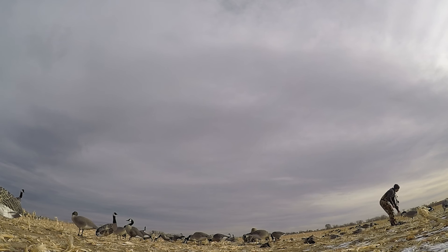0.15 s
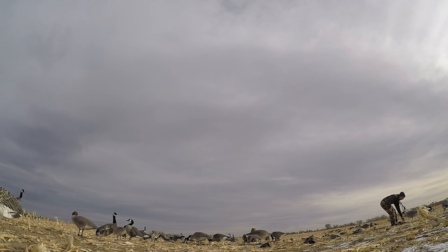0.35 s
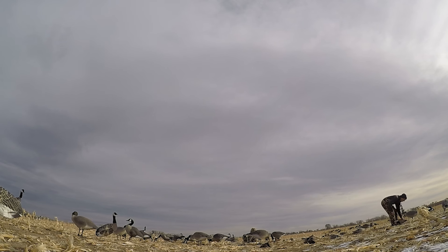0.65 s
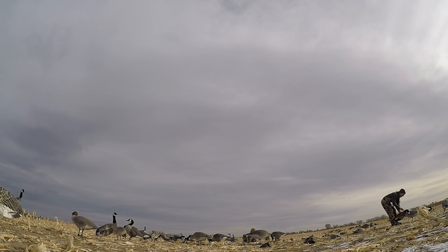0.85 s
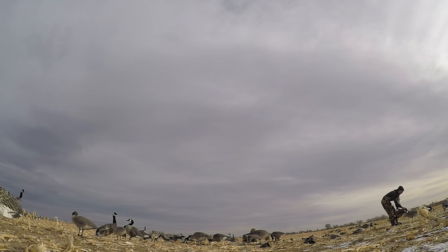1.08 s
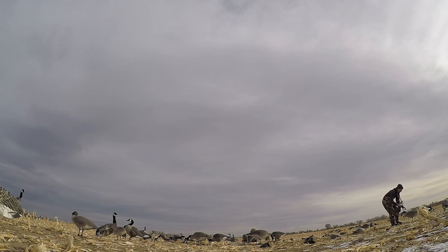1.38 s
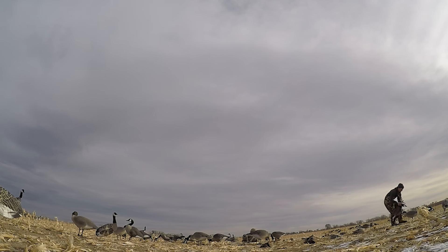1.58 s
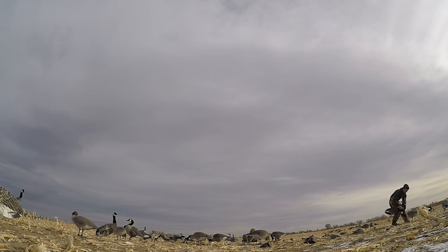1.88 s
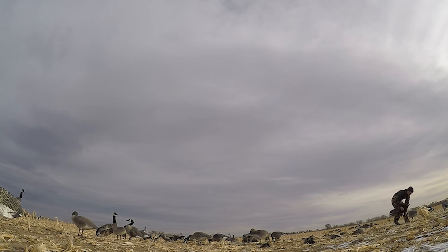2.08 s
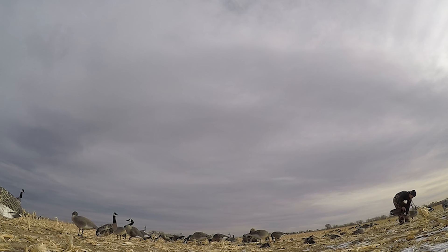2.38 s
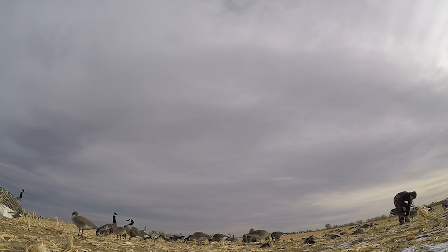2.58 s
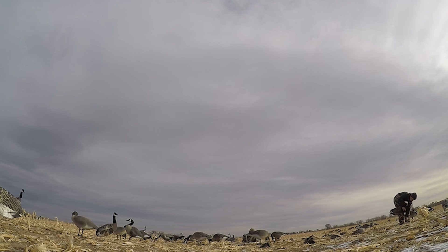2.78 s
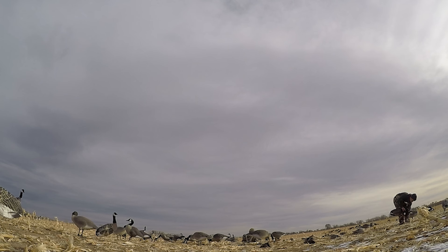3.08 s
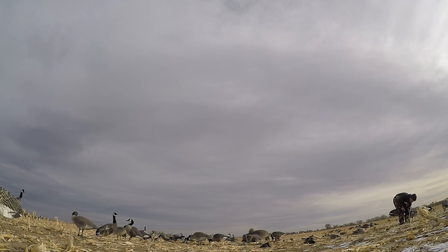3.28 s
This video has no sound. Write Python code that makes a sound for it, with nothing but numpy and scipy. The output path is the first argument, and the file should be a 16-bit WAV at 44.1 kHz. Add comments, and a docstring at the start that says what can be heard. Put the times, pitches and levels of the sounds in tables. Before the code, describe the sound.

Strong wind batters a small exposed microphone in an open stubble field: a loud, deep, fluttering rumble, fullest around 0.75 s, easing near 1.9 s, swelling again about 2.6 s, then weakening to the end at roughly 3.4 s. Hollow rushing air and fine hiss with a very faint whine sit above. Quiet straw snaps and rustles occur around 0.5, 1.05, 1.6 and, sharpest, 2.25-2.5 s.

```python
"""A deep, buffeting rumble fills the sound as strong wind shakes a small camera in a stubble field.
Air rushes and hisses around the housing, with a thin whine in the hiss: all this is noise shaped by pitch.
Some way off, someone treads on dry straw: short bursts of noise with a ping make the snaps,
and dense random clicks make the rustles. A limiter holds the highest peaks."""
import sys
import numpy as np
from scipy import signal
from scipy.fft import rfft, irfft
from scipy.io import wavfile
from scipy.ndimage import uniform_filter1d, minimum_filter1d

SR = 44100
rng = np.random.default_rng(int(sys.argv[2]) if len(sys.argv) > 2 else 0)


def master(y):
    """Save y as 16-bit WAV."""
    cut = np.clip(np.atleast_2d(y).T, -1, 1)
    pcm = np.round(cut * 32767)  # scale
    wavfile.write(sys.argv[1], SR, pcm.astype(np.int16))


N = 152145  # length [samples]

# Strength of the wind: (time [s], level [dB])
WIND_LEVEL = [(0, 1), (.75, 1.45), (1.3, 0.5), (1.9, -0.5), (2.6, 0.9), (3.45, -1.4)]

# In the functions below, a "spectrum" gives the balance of pitches at the two microphone ports,
# and "ports" tells how alike the two hear a sound and how far the left one leads.


def amp(db):
    """Turns decibels into a gain."""
    return 10 ** (np.asarray(db) / 20)


def unit(x):
    """Scales a signal to an average strength (rms) of 1."""
    return x / np.sqrt(np.mean(x ** 2) + 1e-20)


def by_hz(table, hz):
    """Reads every column of a table at the given frequencies, on a logarithmic axis."""
    table_hz, *columns = np.transpose(table)
    place, table_place = np.log(hz + 1), np.log(table_hz + 1)
    return np.array([np.interp(place, table_place, column) for column in columns])


def by_time(table):
    """Reads a curve of (time, level) at every sample."""
    return np.interp(np.arange(N) / SR, *np.transpose(table))


def add(mix, start, sound):
    """Mixes in a stereo sound that starts at the given second."""
    first = max(round(start * SR), 0)
    part = mix[:, first:][:, :sound.shape[1]]
    part += sound[:, :part.shape[1]]


def wander(rate_hz):
    """Slow random drift of rms 1: noise that keeps little above the given rate."""
    hz = np.fft.rfftfreq(N, 1 / SR)
    slow = (hz > 0) * np.exp(-(hz / rate_hz) ** 2)
    return unit(irfft(rfft(rng.standard_normal(N)) * slow, N))


def at_ports(x, spectrum, ports):
    """Turns two unrelated signals into what the ports hear: partly shared, shifted in phase, coloured."""
    hz = np.fft.rfftfreq(N, 1 / SR)
    shared, own = rfft(x)
    same, lead = by_hz(ports, hz)
    same = np.clip(same, 0, 1)
    right = (same * shared + np.sqrt(1 - same ** 2) * own) * np.exp(-1j * lead)
    pair = np.array([shared, right])
    skirt = 1 / (1 + (hz / spectrum[-1][0]) ** 8)  # fades out above the last row of the table
    colour = unit(amp(by_hz(spectrum, hz)) * skirt)
    return irfft(pair * colour, N)


def port_noise(spectrum, ports):
    """Turbulence as coloured noise of rms 1 at the two ports."""
    return unit(at_ports(rng.standard_normal((2, N)), spectrum, ports))


def rumble():
    """Eddies press on both ports almost alike, as deep noise that swells with the wind."""
    # (frequency [Hz], left relative level per Hz [dB], right relative level per Hz [dB])
    rumble_spectrum = [(8.1, -22, -12), (15.4, -3.5, -3), (26.2, -1.5, 0), (43.3, -1, -1.5), (74, -2, -4),
                       (100, -7, -8.5), (138.6, -12, -13.5), (201.6, -19.5, -22.5), (255, -26.5, -29),
                       (339, -32.5, -37.5), (462, -44.5, -56), (1460, -57.5, -75)]
    # (frequency [Hz], likeness [0-1], lead of the left port [rad])
    rumble_ports = [(30, 0.98, -0.0038), (101, 1, 0.23), (210, 0.94, 0.1), (350, 0.5, -0.49)]
    base_db, eddy_db = -7.5, 0.9
    level_db = base_db + by_time(WIND_LEVEL) + eddy_db * wander(rate_hz=6.1)
    return amp(level_db) * port_noise(rumble_spectrum, rumble_ports)


def rush():
    """Air rushes around the housing with a hollow sound that follows most of the wind's changes in dB."""
    # (frequency [Hz], left relative level per Hz [dB], right relative level per Hz [dB])
    rush_spectrum = [(200, -1, -16), (338, -10, -8), (432, -3, -1.5), (552, 0.5, 1), (710, -3, -1),
                     (870, -4.5, -0.5), (1156, -13, -10.5), (1160, -13.5, -5), (1410, -15, -13.5),
                     (1880, -21.5, -19.5), (3540, -31, -36)]
    # (frequency [Hz], likeness [0-1], lead of the left port [rad])
    rush_ports = [(300, 0.77, -5.5), (453, 0.99, -4), (572, 0.94, -5), (790, 0.68, -6), (975, 0.4, -8),
                  (1245, 0.12, -7.5), (1710, 0.46, -9.5)]
    base_db, flutter_db, follow = -33, 0.5, 0.8
    level_db = base_db + follow * by_time(WIND_LEVEL) + flutter_db * wander(rate_hz=3.5)
    return amp(level_db) * port_noise(rush_spectrum, rush_ports)


def hiss():
    """Fine air noise, plus a thin, unsteady whine made of noise in a very narrow band."""
    # (frequency [Hz], left relative level per Hz [dB], right relative level per Hz [dB])
    hiss_spectrum = [(1000, -10.5, -11), (2670, -8.5, -5.5), (3870, -11.5, -10.5), (4400, -9, -10.5),
                     (4760, -13, -10), (5660, -7.5, -10), (6870, -6, -4), (7750, -12, -3.5),
                     (8100, -11.5, -7.5), (9950, -11.5, -8.5), (11800, -15, -15.5), (14000, -18, -17)]
    # (frequency [Hz], likeness [0-1], lead of the left port [rad])
    hiss_ports = [(1730, 0.21, -10), (3000, 0.33, -13), (4970, 0.27, -11.5), (5970, 0.48, -14.5),
                  (8000, 0.29, -15), (10000, .05, -14)]
    # Rise and fall of air and whine together: (time [s], level [dB])
    hiss_level = [(0, -0.2), (.24, 1.6), (.32, -1), (.48, 0.2), (.7, 1.5), (.98, 1), (1.2, 2), (1.65, 1.5),
                  (1.95, .6), (2.3, 0.8), (2.75, 1.5), (2.93, 1), (3.0, -2), (3.15, -1), (3.3, 1),
                  (3.45, -0.3)]
    # Whine before that rise and fall: (left [dB], right [dB])
    whine_db = (-70, -56)
    base_db, flicker_db = -47, 0.53
    whine_hz, whine_width_hz = 7790, 65

    air = amp(base_db + flicker_db * wander(rate_hz=19)) * port_noise(hiss_spectrum, hiss_ports)
    hz = np.fft.rfftfreq(N, 1 / SR)
    narrow = 1 / (1 + (2 * (hz - whine_hz) / whine_width_hz) ** 2)
    whine = unit(irfft(rfft(rng.standard_normal((2, N))) * narrow, N))
    return amp(by_time(hiss_level)) * (air + amp(whine_db)[:, None] * whine)


def snap(level_db, body_db, middle_db, edge_db, ring_hz, ring_db):
    """One stalk breaks: brief splintering, a short ping of its tube and a faint scatter from the ground."""
    # Centres of the three bands: (body [Hz], middle [Hz], edge [Hz])
    bands_hz = (2850, 5000, 9100)
    # A plain stalk, which gets no colour: (body [dB], middle [dB], edge [dB])
    plain_db = (-10, -8.5, -3.5)
    trim_db, colour_share = -6.5, 0.93
    rise_s, hold_s, decay_s, ring_decay_s = 0.0006, 0.0014, 0.0016, 0.0016
    scatter_db, scatter_s = -15.5, 0.019
    size = 4096  # samples
    t, hz = np.arange(size) / SR, np.fft.rfftfreq(size, 1 / SR)

    bands_db = np.subtract([body_db, middle_db, edge_db], plain_db)
    colour = amp(colour_share * by_hz(np.transpose([bands_hz, bands_db]), hz))
    fibres = irfft(rfft(rng.standard_normal((2, size))) * colour, size)
    splinter = np.exp(-np.maximum(t - hold_s, 0) / decay_s)
    scatter = amp(scatter_db) * np.exp(-t / scatter_s)
    phase = rng.random((2, 1))  # in turns, one for each channel
    tube = amp(ring_db) * np.exp(-t / ring_decay_s) * np.sin(2 * np.pi * (ring_hz * t + phase))
    onset = np.minimum(t / rise_s, 1)
    return amp(trim_db + level_db) * onset * ((splinter + scatter) * fibres + tube)


def grains(per_s, spread_db):
    """Random clicks of uneven size, each with its own strength in the two channels; rms 1 overall."""
    size = amp(spread_db * np.minimum(rng.exponential(1, N), 4))
    clicks = size * (rng.random(N) < per_s / SR)
    return unit(clicks * rng.standard_normal((2, N)))


def straw():
    """Dry stalks snap, crunch in rustles under the boots, and tick here and there in the wind."""
    # Stalks that snap, before trim and colouring: (time [s], level [dB], body [dB], middle [dB],
    # edge [dB], ring [Hz], ring level [dB])
    snaps = [(0.2213, -31, -13, -23, -4, 4000, -8), (0.5144, -17, -9.5, -14, -9.5, 7130, -1.5),
             (0.5177, -28.5, -6, -8, -10, 8400, -3), (0.553, -27.5, -20, -12, -5, 7000, -3),
             (0.6564, -31, -14, -14, -5, 4590, -6), (0.6927, -31.5, -12, -9, -9, 4100, -6),
             (0.745, -26, -17, -13, -5, 7360, -9), (0.7808, -28, -21, -16, -7, 7100, -5),
             (1.0411, -27, -14, -12, -8, 6100, 3), (1.044, -26, -8, -12, -11, 5940, -3),
             (1.053, -25, -10, -17, -13, 5560, -5), (1.0827, -25, -9, -21, -6.5, 7040, -5),
             (1.2427, -29, -1, -14, -21, 4430, 3), (1.3238, -22, -16, -15, -4, 7450, -11),
             (1.5742, -25, -12, -14, -18, 5200, 0), (1.6194, -27, -10, -12, -15, 7440, -8),
             (1.6734, -30, -15, -9, -9, 5510, -5), (1.7535, -24.5, -11, -8, -7, 4860, 4),
             (1.8501, -30, -7, -15, -18, 5520, -5), (2.017, -28, -19, -14, -5.5, 3900, -8),
             (2.1559, -28, -11, -10, -13, 7400, -10), (2.1714, -32, -16, -19, -4, 7100, -6),
             (2.2213, -29, -18, -8, -7, 7500, -10), (2.2365, -26, -18, -9, -6, 5300, -1),
             (2.2635, -13, -16, -14.5, -5.5, 2800, -13), (2.3135, -26, -18, -15, -5, 5280, 2.5),
             (2.3752, -25.5, -20, -16, -5, 8460, 1.5), (2.4504, -17.5, -26, -18, -5.5, 5300, 0),
             (2.466, -20.5, -21, -15, -6, 5350, 3), (2.486, -25.5, -13, -18, -12, 4360, 0),
             (2.681, -24.5, -23, -17, -8, 6700, 0), (2.8355, -32.5, -14, -13, -17, 4270, -1)]
    # Boots brushing through the straw, before colouring: (start [s], length [s], level [dB])
    rustles = [(.74, 0.1, -46), (1.032, 0.036, -39.5), (1.061, 0.049, -40), (1.107, 0.11, -47.5),
               (1.549, 0.05, -41), (1.596, 0.058, -39.5), (1.844, .03, -55), (2.228, 0.015, -43.5)]
    # (frequency [Hz], left relative level per Hz [dB], right relative level per Hz [dB])
    straw_spectrum = [(700, -30, -30), (2370, -10, -7), (3000, -12, -7.5), (4030, -23, -14),
                      (4320, -13, -4), (5100, -14, -12.5), (5620, -6, -8), (6340, -13, -8.5), (7230, -6, 1),
                      (8180, -12, -3), (9500, -22, -15.5), (11300, -29, -27.5), (14000, -38, -35)]
    # (frequency [Hz], likeness [0-1], lead of the left port [rad])
    straw_ports = [(2050, 0.17, -9.5), (3020, 0.57, -14), (4070, 0.71, -11), (4900, 0.73, -14.5),
                   (5540, 0.95, -14.5), (6200, 1, -15), (8200, 0.75, -14.5), (10000, .3, -14.5)]
    ticks_db = -57.5
    peak_share = 0.26  # where in its length a rustle is loudest

    t = np.arange(N) / SR
    out = amp(ticks_db) * grains(per_s=90, spread_db=1)
    crunch = grains(per_s=1600, spread_db=1.5)
    for start, length, db in rustles:
        pressure = np.interp((t - start) / length, [0, peak_share, 1], [0, 1, 0])
        out = out + amp(db) * np.sqrt(pressure) * crunch
    for start, *stalk in snaps:
        add(out, start, snap(*stalk))
    return at_ports(out, straw_spectrum, straw_ports)


def scene():
    """Adds up the wind at the camera and the straw in the field."""
    return rumble() + rush() + hiss() + straw()


def record(dry):
    """A fast look-ahead limiter rounds the highest swings; then a filter removes the top treble."""
    ceiling, knee = 0.98, 4.7  # a higher knee bends more sharply
    hold_s, edge_hz = 0.012, 14600
    size = int(hold_s * SR)
    loudest = abs(dry).max(0)  # of the two channels
    wanted = (1 + (loudest / ceiling) ** (2 * knee)) ** (-0.5 / knee)
    held = minimum_filter1d(wanted, size)  # looks ahead and back
    gain = uniform_filter1d(uniform_filter1d(held, size // 2), size // 2)
    low_pass = signal.firwin(255, edge_hz, window=("kaiser", 9), fs=SR)
    return signal.filtfilt(low_pass, 1, dry * gain)


dry = scene()
out = record(dry)
master(out)
```